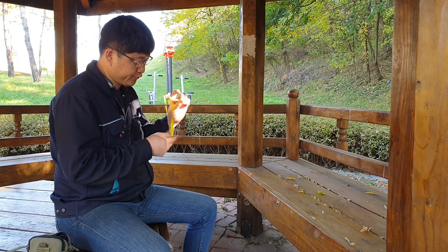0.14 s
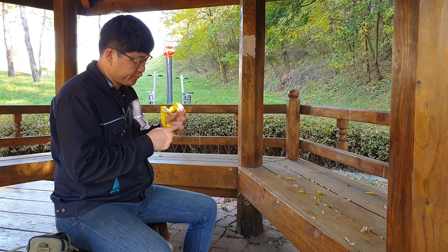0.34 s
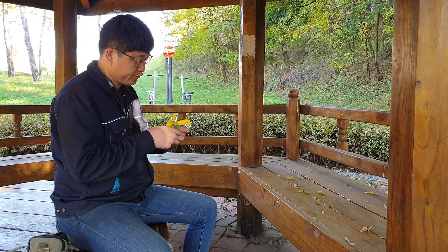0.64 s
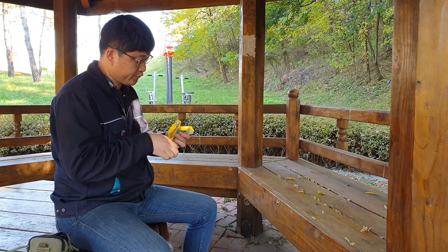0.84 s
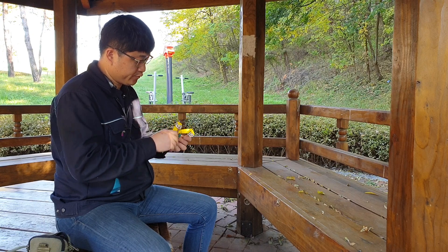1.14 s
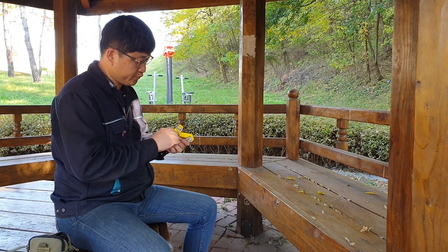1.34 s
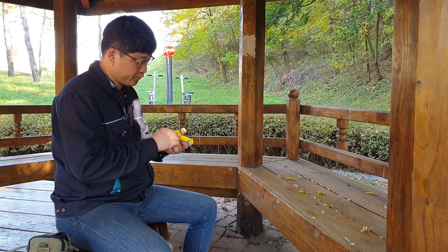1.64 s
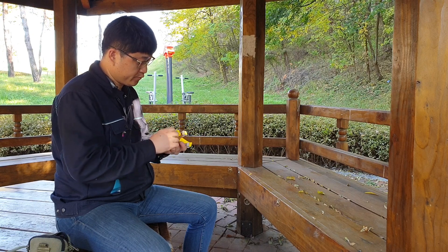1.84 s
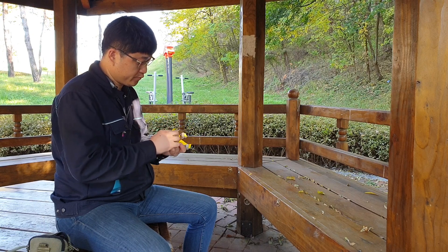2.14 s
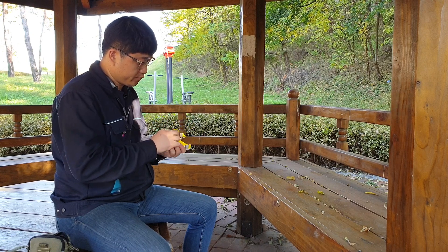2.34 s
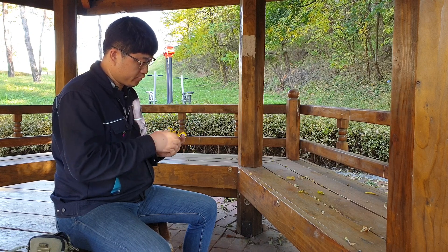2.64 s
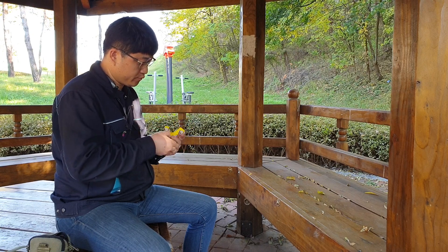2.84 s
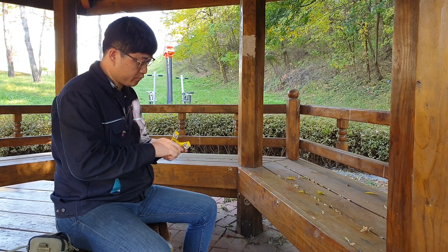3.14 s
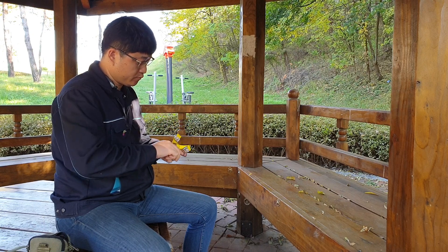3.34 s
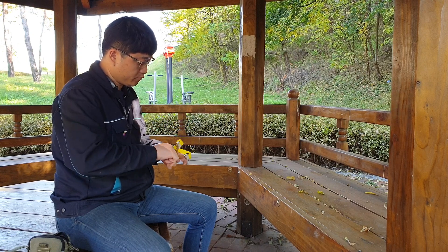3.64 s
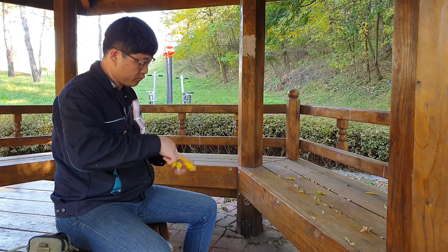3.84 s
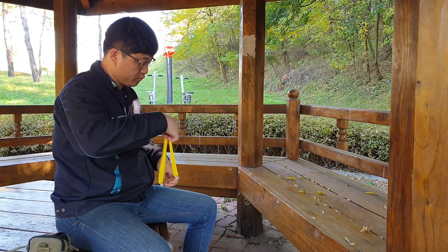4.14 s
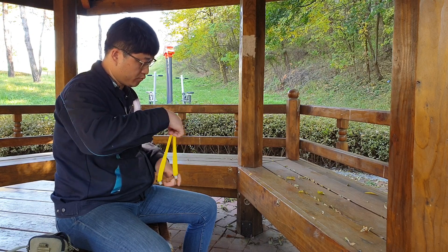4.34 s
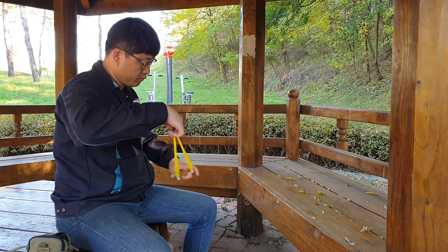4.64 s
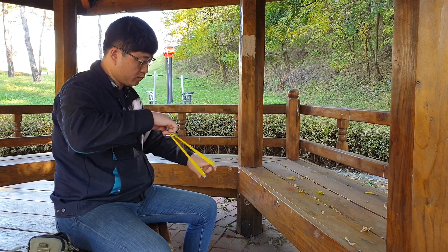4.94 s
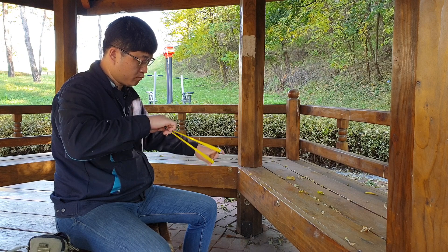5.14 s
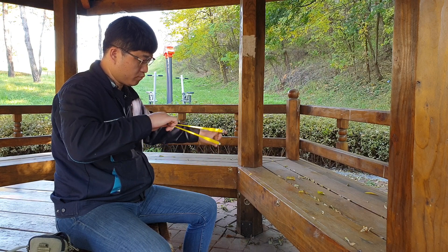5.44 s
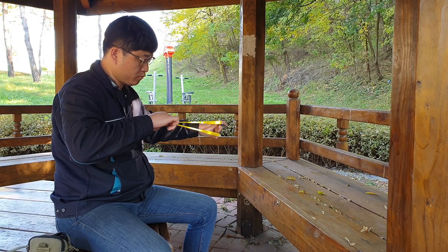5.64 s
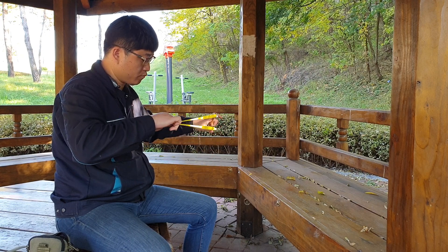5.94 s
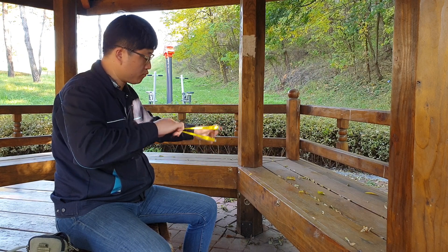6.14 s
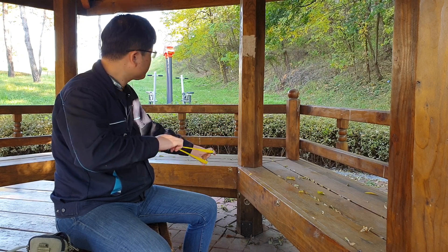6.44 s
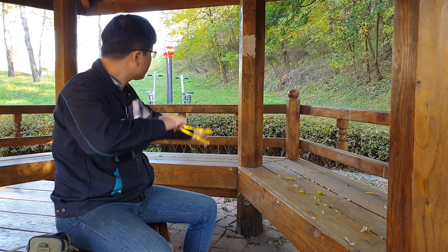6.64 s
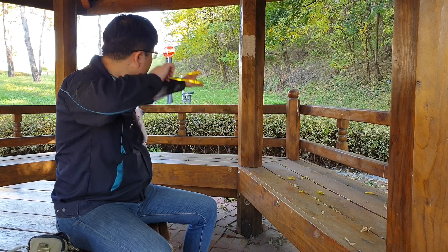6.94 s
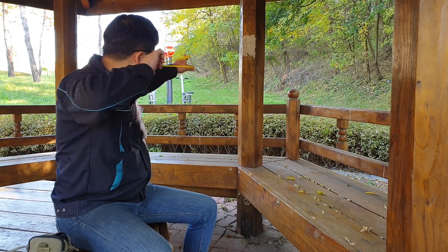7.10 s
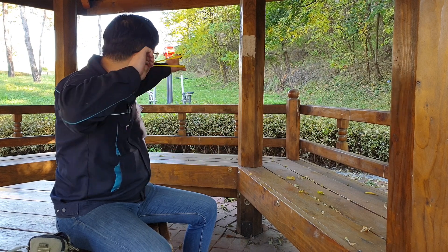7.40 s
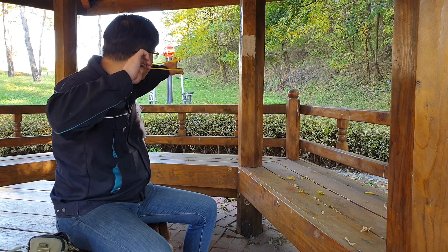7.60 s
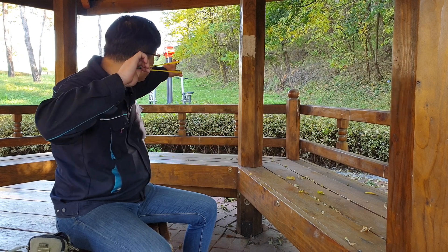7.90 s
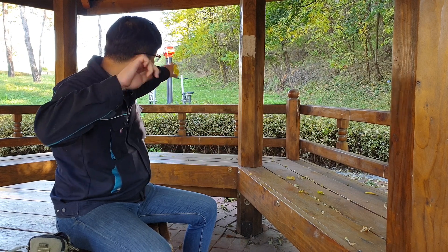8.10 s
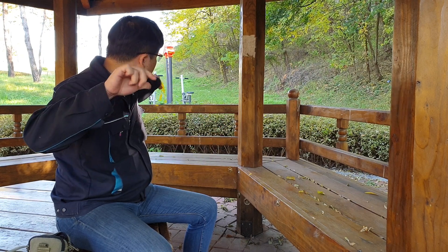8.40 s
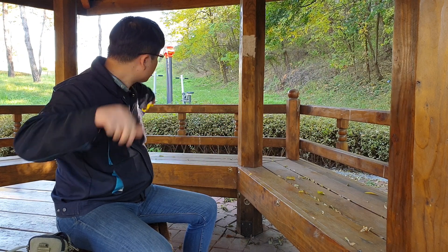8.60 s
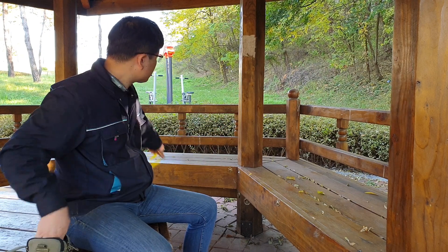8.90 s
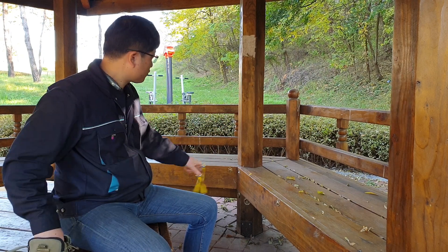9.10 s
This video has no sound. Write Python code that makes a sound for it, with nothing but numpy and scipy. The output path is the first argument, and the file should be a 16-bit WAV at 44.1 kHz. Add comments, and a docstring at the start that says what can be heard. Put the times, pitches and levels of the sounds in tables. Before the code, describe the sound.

A phone two metres away hears a slingshot loaded and fired outdoors under a wooden roof. Continuous muffled road rumble with faint wavering engine tones and barely audible hiss forms the bed. Two light ticks come first, then two weak bird calls and isolated small knocks. After a long quiet draw, a single bright rubber whip-crack bursts out, fades within a fraction of a second, and leaves tiny clicks and scraping fabric or dry leaves.

```python
"""An open wooden shelter by a wooded slope, a phone two metres from a slingshot being loaded, drawn and released.
The bands flap and slap: dense noise cracks and single bursts, with decaying noise for the shelter's echo.
Small resonant ticks of pouch, ball and twigs and scraping grains of dry leaves and sleeve lie around the shot.
Far traffic is shaped noise that swells, with wavering tones and a soft hiss;
a small bird, an arched whistle, calls twice."""
import sys
import numpy as np
from scipy import signal
from scipy.fft import rfft, irfft, next_fast_len
from scipy.io import wavfile
from scipy.ndimage import uniform_filter1d

SR = 44100
rng = np.random.default_rng(int(sys.argv[2]) if len(sys.argv) > 2 else 0)


def transcribe(u):
    """Save the signal u as a 16-bit wav file named by the first command-line argument.

    u: samples, shape (n,) or (channels, n), limited to [-1, 1]; the rate is SR.
    q: integer samples, one column per channel.
    """
    v = np.clip(np.atleast_2d(u).T, -1, 1)
    q = np.round(v * 32767).astype(np.int16)
    wavfile.write(sys.argv[1], SR, q)


N = 408366  # samples
TIME = np.arange(N) / SR  # s
FFT_SIZE = next_fast_len(N)

# Spectrum of the far traffic. Each row: frequency in Hz, relative level in dB per Hz.
TRAFFIC_SPECTRUM = [(15, -51), (25, -23.5), (40, -17), (57, 2), (72, 1.5), (97, -4.5), (166, -3), (204, -5),
                    (397, -14.5), (628, -24.5), (726, -22), (1150, -29), (2010, -43), (2750, -66.5),
                    (3600, -77.5), (4680, -101), (7920, -120)]
# How alike the traffic is at the two microphone ports. Each row: frequency in Hz, left-right correlation.
TRAFFIC_LIKENESS = [(60, 1), (250, 0.96), (500, 0.8), (1000, 0.6), (4000, .1), (15000, .05)]
# Lean of the traffic to one side. Each row: frequency in Hz, left minus right in dB.
TRAFFIC_PAN = [(60, 3.0), (110, 2.5), (200, 3.0), (380, 3), (700, 5), (1290, 4.5), (2380, 8.5), (4400, 19),
               (8120, 0.5), (15000, -5)]
# Swells (+) and lulls (-) of the far traffic. Each row: peak in seconds, half length in seconds,
# centre in Hz, glide in octaves per second, half width in octaves, change in dB.
TRAFFIC_SWELLS = [(0.3, 0.25, 130, 0.32, .4, 3), (0.9, 0.24, 270, .8, .7, 10),
                  (1.25, .27, 470, 0.053, .55, 9.5), (0.8, .25, 480, 0, .4, 5), (1.2, .35, 40, 0, .3, -4.5),
                  (2.05, 0.46, 200.6, -1.2, .6, -6.5), (2.8, .18, 280, .5, .6, 7.5),
                  (3.35, .2, 423, .8, .5, 5), (3.8, .25, 130, -.8, .5, 3.5), (4.4, .2, 238.2, -.5, .4, 5.5),
                  (5.1, .25, 115, .5, .4, -4.5), (5.2, .5, 382, 0, .35, -5.5),
                  (5.7, .45, 1131, -0.14, .4, 3), (6.2, 0.6, 71.5, 0, .6, 4.5),
                  (6.1, .15, 152, 0.32, .5, 4.5), (6.7, .2, 199.6, 0, .3, -3.5),
                  (7.2, 0.22, 119.6, 0, .5, 7.5), (7.8, .2, 327.8, -.8, .5, -7),
                  (8.4, .2, 115.8, -0.12, .4, -8), (8.9, .3, 59, -0.11, .6, -4.5),
                  (9.1, .3, 400, 0.26, .6, -5), (9.2, .15, 180, 0, .25, 6),
                  (2.602, 0.94, 1900, 0.091, .7, -2.5), (6.001, 0.96, 2000, 0, .6, 3),
                  (0.2, .3, 900, 0, .8, 1.5), (6.2, 0.14, 400, 0, .3, -6), (1.7, .25, 60, 0, 0.56, -3),
                  (4.05, .12, 65, 0, 0.39, 3.5), (7.0, .15, 65, 0, 0.31, 3.5), (8.9, .4, 1200, 0, .7, -2),
                  (5.55, .15, 65, 0, .5, 4), (4.5, .3, 140, 0, .3, 3), (5.8, 0.13, 480, 0, .4, 4),
                  (8.55, 0.11, 450, 0, .4, 4), (3.7, .6, 900, 0, 0.31, 2), (8.7, .4, 230, 0, 0.22, -3),
                  (8.3, .15, 230, 0, .4, -4), (6.5, .3, 480, 0, 0.32, -3), (8.5, .2, 150, 0, .4, 3)]
# Tones of far engines and tyres. Each row: start in seconds, end in seconds, start pitch in Hz,
# end pitch in Hz, peak level in dB before waver and panning.
ENGINE_TONES = [(0.2, 1.4, 200, 203, -35), (0.1, 1.0, 155, 150, -39), (0.0, 1.2, 340, 335, -43),
                (2.2, 4.0, 220, 198, -39), (2.9, 3.7, 372, 368, -45), (0.8, 1.6, 545, 555, -51),
                (8.9, 9.5, 185, 190, -37), (0.3, 4.3, 800, 850, -58), (0.9, 3.0, 745, 735, -57),
                (3.7, 7.1, 485, 470, -54), (5.1, 6.0, 1135, 1145, -58), (5.2, 6.1, 948, 945, -57),
                (8.2, 9.5, 785, 788, -58)]
# Far leaves and microphone noise. Each row: frequency in Hz, relative level in dB per Hz.
HISS_SPECTRUM = [(1500, -29.5), (2600, -5.5), (3400, -10), (6200, -15.5), (7500, -13.5), (8100, -19.5),
                 (9200, -20.5), (11500, -13.5), (15500, -10), (15900, -40.5)]
# Calls of the bird. Each row: start in seconds, length in seconds, top pitch in Hz before flutter,
# level at the top in dB before flutter and echo.
CALLS = [(2.065, .11, 3960, -70.5), (2.782, 0.1, 3920, -65.5)]
# Echoes of the bird from near trunks. Each row: delay in seconds, level in dB against the direct call.
TRUNK_ECHOES = [(0.036, -9), (.066, -13.5)]
# Rustles of leaves and sleeve. Each row: peak in seconds, rise in seconds, hold in seconds,
# fade in dB per second, level near 7 kHz in dB before panning, lower part in dB and treble in dB against it.
LEAF_AND_SLEEVE = [(0.006, .004, .002, 200, -71.5, 10.5, -17), (0.089, .003, 0.0018, 91, -75.5, 12.5, -18),
                   (3.70, .03, .01, 148, -86, 0, -5), (4.036, .01, .01, 70.5, -82.5, 2.5, -5.5),
                   (6.786, .02, .01, 63, -81.5, -2, -10.5), (7.0, 0.18, 0.076, 49.5, -87.5, 1, -4),
                   (8.612, .004, .03, 130, -71.5, 5.5, -4), (8.94, 0.059, .03, 60, -76, -1, -10),
                   (9.062, 0.016, .06, 90, -69, 1.5, 0), (9.17, .02, .03, 167, -67, 6.5, 3)]
# Small ticks of pouch, ball and twigs. Each row: start in seconds, dry peak in dB, centre in Hz,
# width in Hz, echo in dB against the tick.
SMALL_TICKS = [(0.002, -52, 4800, 3500, -5.5), (0.0867, -46, 5000, 4600, -10),
               (3.232, -65.5, 13500, 3000, 5.5), (3.68, -76, 7200, 2000, -5), (4.027, -59, 4500, 4970, -10),
               (6.771, -75, 7300, 2000, -8.5), (7.62, -72, 5580, 3480, 9), (8.590, -52, 7500, 4500, -9),
               (8.604, -57, 7000, 4020, 11), (8.611, -61, 5470, 5000, 0)]
# Echo time of the shelter. Each row: frequency in Hz, time to fall 60 dB in seconds.
SHELTER_DECAY = [(500, 0.26), (2000, 0.23), (6000, 0.19), (15000, 0.18)]
# Single slaps of band and pouch. Each row: start in seconds, peak in dB before echo and rubber colour,
# left minus right in dB before the rubber's own lean.
BAND_SLAPS = [(8.1087, -28, 5), (8.1248, -16, 2), (8.1343, -14, 3), (8.1392, -19, 4), (8.1462, -17, 3),
              (8.1508, -11, 5), (8.1553, -15, 4), (8.1567, -16, 4), (8.1600, -17, 4), (8.1643, -17, 5)]
# Colour of the rubber cracks. Each row: frequency in Hz, relative gain in dB.
RUBBER_COLOUR = [(200, -22), (330, 4), (540, 0.5), (1190, -3), (1400, -6), (2390, -5), (3920, -4),
                 (5600, -6.5), (7530, -3), (8700, -8.5), (14000, 0.5), (15700, -4.5), (16500, -23)]
# Lean of the rubber cracks to one side. Each row: frequency in Hz, left minus right in dB.
RUBBER_LEAN = [(60, 10.5), (110, 5), (200, 2.5), (380, 6.5), (700, 1.5), (1290, 8.5), (2380, 3.5),
               (4400, 7), (8120, 5.5), (15000, -1.5)]

PORT_LAG_S = 0.00018  # the rumble reaches the left port later
TRAFFIC_DB, WANDER_DB = -29, 1.7  # overall level, spread of each band's slow wander
HISS_DB = -79  # before its slow waver and lean to the left
BIRD_ARCH_HZ, BIRD_TOP_AT, BIRD_SWELL_DB = 620, 0.6, 24  # pitch fall, place of the top (0-1), level fall
RUSTLE_RISE_DB = 14.5  # climb within each rustle's rise time
SLOPE_T60_S, SLOPE_DB = 0.6, -27  # the slope's decay, and its gain in the mix of echoes
# the bands creak as the pouch slips, whip through the fork, then settle; levels before echo and rubber colour
SLIP_S, WHIP_S, WHIP_HOLD_S, WHIP_RISE_S = 8.11, 8.127, 0.036, 0.0027
SLIP_DB, WHIP_DB, SETTLE_DB_PER_S = -46.5, -24.5, 552
TOP_HZ = 16300  # where the phone cuts the treble


def undb(db):
    """Turn decibels into an amplitude factor."""
    return 10 ** (np.asarray(db) / 20)


def unit(x):
    """Scale to an RMS of 1."""
    return x / np.sqrt(np.mean(x ** 2))


def at_hz(table, hz):
    """Read (Hz, value) points on a log axis."""
    f, value = np.transpose(table)
    return np.interp(np.log(np.maximum(hz, 1)), np.log(f), value)


def colour(x, db_at):
    """Causal filter with the gain db_at(Hz), from the folded cepstrum."""
    size = 2048
    cepstrum = irfft(db_at(np.fft.rfftfreq(size, 1 / SR)) * np.log(10) / 20)
    cepstrum[1:size // 2] *= 2
    cepstrum[size // 2 + 1:] = 0
    response = irfft(np.exp(rfft(cepstrum)))
    return signal.oaconvolve(x, response)[:len(x)]


def band(x, lo_hz, hi_hz):
    """Keep what lies between two frequencies, with gentle edges."""
    edges = [lo_hz, min(hi_hz, 0.45 * SR)]
    return signal.sosfilt(signal.butter(2, edges, "bandpass", fs=SR, output="sos"), x)


def walk(rate):
    """Random levels held 1 / rate s and slewed twice; spread near 1."""
    k = int(SR / rate)
    steps = np.repeat(rng.standard_normal(N // k + 1), k)
    return 1.3 * uniform_filter1d(uniform_filter1d(steps, k), k)[:N]


def arc(peak_s, rise_s, rise_db, fade_db_per_s, hold_s=0):
    """Gain that climbs to 1 at rise_db per rise_s, holds and fades."""
    climb_db = rise_db * (TIME - peak_s) / rise_s
    fade_db = -fade_db_per_s * np.maximum(TIME - peak_s - hold_s, 0)
    return undb(np.minimum(climb_db, fade_db))


def grains(rate, spread_db):
    """Two channels of dense cracks (rate per s) with long-tailed sizes and a weaker part common to both."""
    size = (rng.random(N) < rate / SR) * undb(spread_db * rng.exponential(size=N))
    common, *own = rng.standard_normal((3, N))
    return np.array([unit(size * (0.35 * common + o)) for o in own])


def burst(count, ms):
    """Short decaying noise for each event and channel, peak 1."""
    x = rng.standard_normal((count, 2, 400)) * np.exp(-np.arange(400) / SR / ms * 1000)
    return x / abs(x).max(axis=2, keepdims=True)


def echo(x, echo_db):
    """Each channel hears the shelter's quick tail and the slope's longer, duller one."""
    t = np.arange(SR) / SR

    def fade(t60):
        return 10 ** (-3 * t / t60)

    out = []
    for channel in x:
        noise = rng.standard_normal((2, SR))
        shelter = sum(band(noise[0], hz / 2.6, hz * 1.7) * fade(t60) for hz, t60 in SHELTER_DECAY)
        slope = band(noise[1], 800, 8000) * fade(SLOPE_T60_S) * np.minimum(t / 0.05, 1)
        tail = shelter * np.minimum(t / 0.004, 1) + undb(SLOPE_DB) * slope
        tail = tail / np.sqrt(np.sum(tail ** 2))
        out.append(channel + undb(echo_db) * signal.oaconvolve(channel, tail)[:N])
    return np.array(out)


def traffic():
    """Third-octave bands of noise; each takes its part of the swells and wanders alone."""
    hz = np.fft.rfftfreq(FFT_SIZE, 1 / SR)
    like = np.clip(at_hz(TRAFFIC_LIKENESS, hz), 0, 1)
    gain = undb(at_hz(TRAFFIC_SPECTRUM, hz))
    mid, side = (rfft(rng.standard_normal(FFT_SIZE)) * gain for _ in range(2))
    mid, side = mid * np.sqrt(1 + like), side * np.sqrt(1 - like)
    pan = undb(at_hz(TRAFFIC_PAN, hz) / 2)
    lag = np.exp(-2j * np.pi * hz * PORT_LAG_S)
    pair = np.array([(mid + side) * pan * lag, (mid - side) / pan])

    peak_s, half_s, centre_hz, glide, octaves, swell_db = np.transpose(TRAFFIC_SWELLS)[:, :, None]
    coarse = TIME[::256]
    since = coarse - peak_s
    place = np.clip(np.log2(np.maximum(hz, 1) / 40) * 3, 0, 18)  # third octaves above 40 Hz
    out = 0
    for k in range(19):
        share = np.clip(1 - abs(place - k), 0, 1)  # overlapping triangles
        away = np.log2(40 * 2 ** (k / 3) / centre_hz) - glide * since
        swell = np.sum(swell_db * np.exp(-(since / half_s) ** 2 - (away / octaves) ** 2), axis=0)
        level_db = np.interp(TIME, coarse, swell) + WANDER_DB * walk(2.5)
        out = out + irfft(pair * share, FFT_SIZE)[:, :N] * undb(level_db)
    return undb(TRAFFIC_DB) * unit(out)


def hums():
    """Sine tones of far engines and tyres fade in and out, drift in pitch and waver in level."""
    out = np.zeros(N)
    drift_hz, waver_db = 6 * walk(14), 3 * walk(12)
    shifts = rng.integers(0, N, len(ENGINE_TONES))  # each tone reads the drift from its own place
    for (start_s, end_s, start_hz, end_hz, level_db), shift in zip(ENGINE_TONES, shifts):
        i = np.arange(int(start_s * SR), min(int(end_s * SR), N))
        u = (i / SR - start_s) / (end_s - start_s)
        wander = (i + shift) % N
        hz = start_hz + (end_hz - start_hz) * u + drift_hz[wander]
        fade = np.sqrt(np.sin(np.pi * u).clip(0))
        out[i] += undb(level_db + waver_db[wander]) * fade * np.sin(2 * np.pi * np.cumsum(hz) / SR)
    return np.array([undb(4.5) * np.roll(out, int(PORT_LAG_S * SR)), undb(-0.3) * out])


def hiss():
    """A smooth, wide noise of far leaves and microphone, a little louder on the left."""
    hz = np.fft.rfftfreq(FFT_SIZE, 1 / SR)
    spectrum = rfft(rng.standard_normal((2, FFT_SIZE))) * undb(at_hz(HISS_SPECTRUM, hz))
    x = irfft(spectrum, FFT_SIZE)[:, :N]
    return undb(HISS_DB + 0.6 * walk(1.5)) * unit(x) * undb([[1.5], [-1.5]])


def bird():
    """A whistle arched in pitch and level, repeated by two near trunks and smeared by the wood."""
    call = 0
    for start_s, length_s, top_hz, level_db in CALLS:
        u = (TIME - start_s) / length_s
        before, after = 1 - u / BIRD_TOP_AT, (u - BIRD_TOP_AT) / (1 - BIRD_TOP_AT)
        off = np.where(u < BIRD_TOP_AT, before, after)  # 0 at the top, 1 at the ends
        sounding = off < 1
        off = np.minimum(off, 1)
        hz = (top_hz - BIRD_ARCH_HZ * off ** 2) * (1 + 0.02 * walk(260))
        gain = undb(level_db - BIRD_SWELL_DB * off ** 1.4 + 2.7 * walk(150))
        call = call + sounding * gain * np.sin(2 * np.pi * np.cumsum(hz) / SR)

    t = np.arange(SR // 2) / SR
    decay = 10 ** (-3 * t / 0.42) * np.minimum(t / 0.02, 1)
    trees = undb(-28.5) * rng.standard_normal((2, len(t))) * decay
    trees[:, 0] = 1  # the direct call
    for delay_s, echo_db in TRUNK_ECHOES:
        trees[:, int(delay_s * SR)] += undb(echo_db)
    return signal.oaconvolve(call[None], trees, axes=1)[:, :N]


def rustle():
    """Fine scraping grains, a little patchy; the phone's port lifts them near 7 kHz."""
    grit = grains(14000, 1.5) * undb(walk(90))
    ranges_hz = (2200, 6100), (6500, 7900), (9000, 15100)
    low, port, high = (unit(band(band(grit, *hz), *hz)) for hz in ranges_hz)
    out = 0
    for peak_s, rise_s, hold_s, fade, level_db, low_db, high_db in LEAF_AND_SLEEVE:
        scrape = port + undb(low_db) * low + undb(high_db) * high
        out = out + undb(level_db) * arc(peak_s, rise_s, RUSTLE_RISE_DB, fade, hold_s) * scrape
    return out * undb([[2], [-2]])


def ticks():
    """Small knocks: a fast-decaying noise burst in one broad resonance, with its echo."""
    dry, wet = np.zeros((2, N)), np.zeros((2, N))
    bursts = burst(count=len(SMALL_TICKS), ms=1.2)
    for (start_s, peak_db, hz, width_hz, echo_db), x in zip(SMALL_TICKS, bursts):
        lo_hz, hi_hz = max(hz - width_hz / 2, 500), hz + width_hz / 2
        x = band(band(x, lo_hz, hi_hz), lo_hz, hi_hz)
        x = x * undb(peak_db) / abs(x).max()
        i = int(start_s * SR)
        dry[:, i:i + x.shape[1]] += x
        wet[:, i:i + x.shape[1]] += x * undb(echo_db)
    return dry + echo(wet, 0) - wet  # only the tail of wet is kept


def snap():
    """The slack bands crackle as they whip through the fork; single slaps are laid on top."""
    slip = undb(SLIP_DB) * arc(SLIP_S, WHIP_RISE_S, 7.7, SETTLE_DB_PER_S, WHIP_S - SLIP_S)
    whip = undb(WHIP_DB) * arc(WHIP_S, WHIP_RISE_S, 13, SETTLE_DB_PER_S, WHIP_HOLD_S)
    cracks = grains(16000, 1.5) * (slip + whip)
    for (start_s, peak_db, pan_db), x in zip(BAND_SLAPS, burst(count=len(BAND_SLAPS), ms=0.35)):
        i = int(start_s * SR)
        cracks[:, i:i + x.shape[1]] += x * undb(peak_db + np.array([[pan_db], [-pan_db]]) / 2)

    def rubber_db(hz, side):
        return 8 + at_hz(RUBBER_COLOUR, hz) + side * at_hz(RUBBER_LEAN, hz) / 2

    left, right = echo(cracks, -6.5)
    return np.array([colour(left, lambda hz: rubber_db(hz, 1)),
                     colour(right, lambda hz: rubber_db(hz, -1))])


def scene():
    """All sources as they reach the phone, from the far traffic to the slingshot."""
    return traffic() + hums() + hiss() + bird() + rustle() + ticks() + snap()


def record(dry):
    """The phone cuts the top with a steep low-pass."""
    return signal.sosfilt(signal.ellip(10, 0.2, 80, TOP_HZ, fs=SR, output="sos"), dry)


dry = scene()
out = record(dry)
transcribe(out)
```